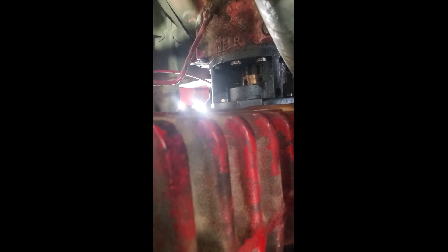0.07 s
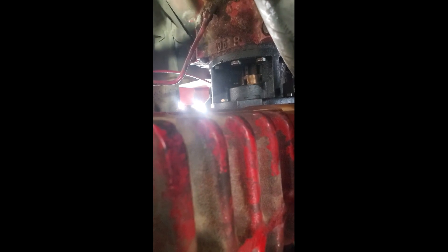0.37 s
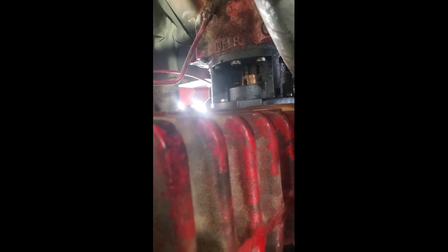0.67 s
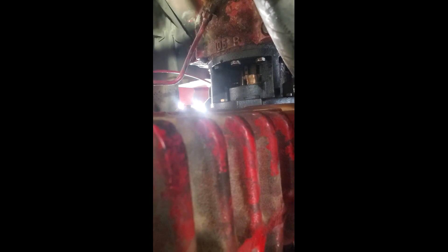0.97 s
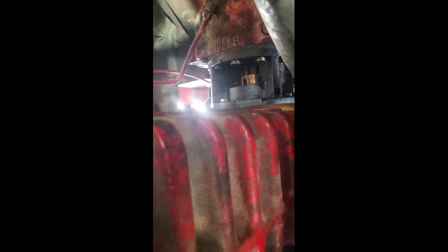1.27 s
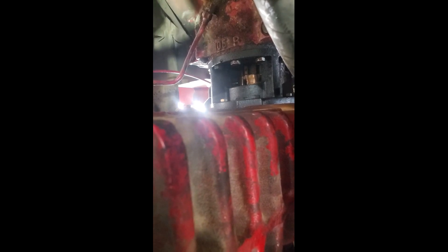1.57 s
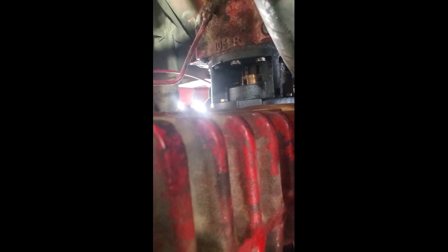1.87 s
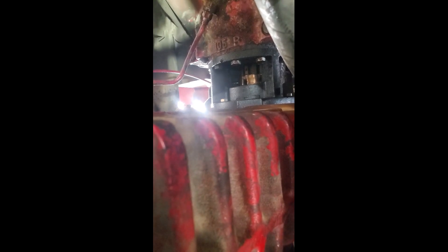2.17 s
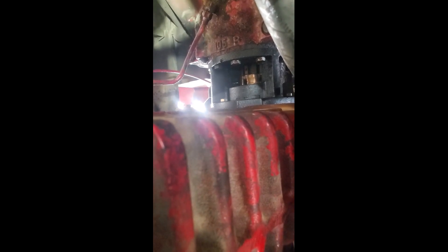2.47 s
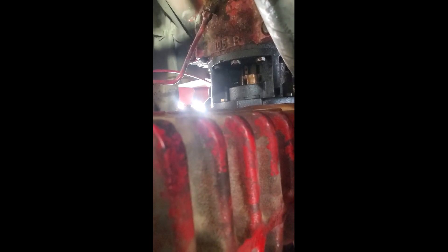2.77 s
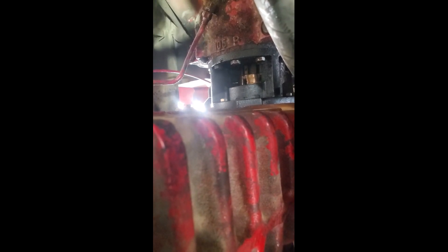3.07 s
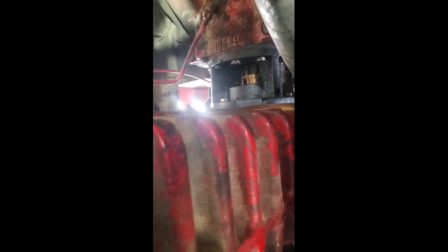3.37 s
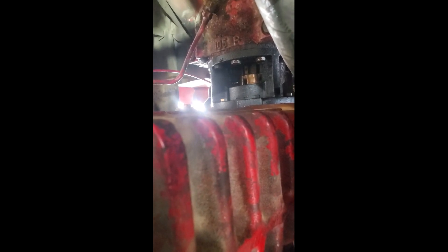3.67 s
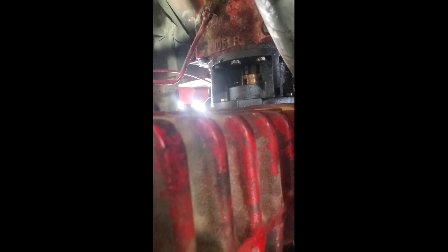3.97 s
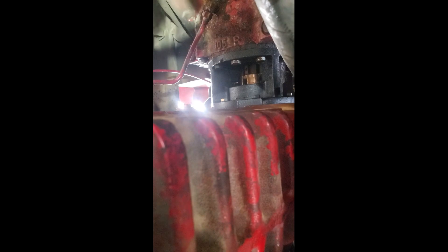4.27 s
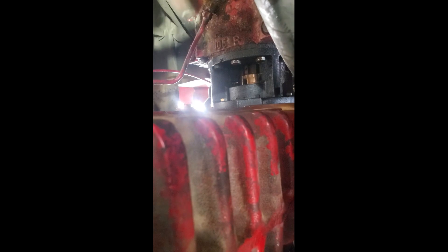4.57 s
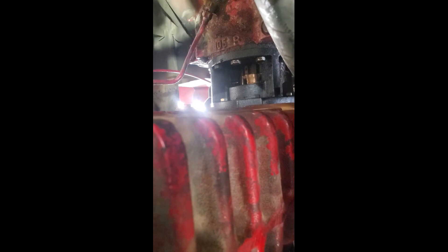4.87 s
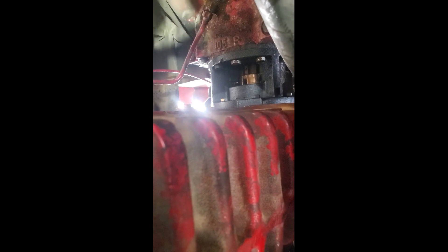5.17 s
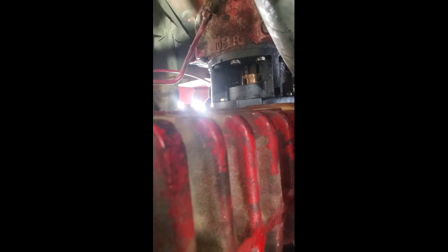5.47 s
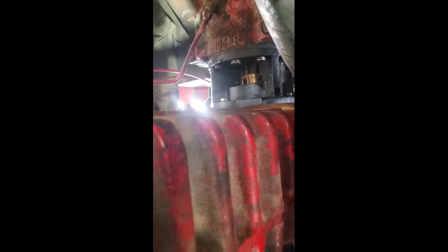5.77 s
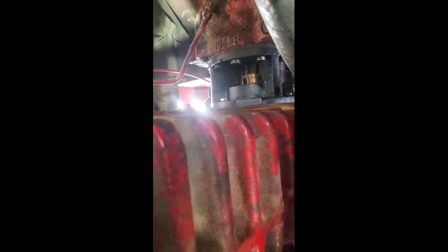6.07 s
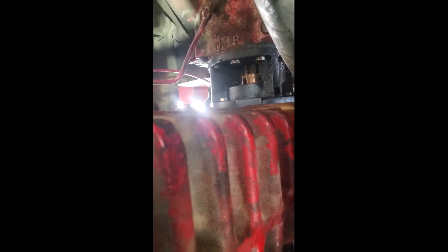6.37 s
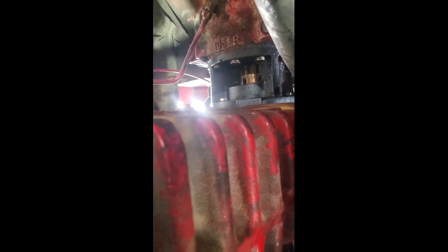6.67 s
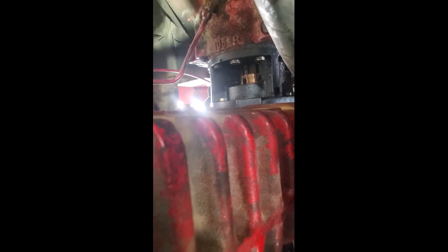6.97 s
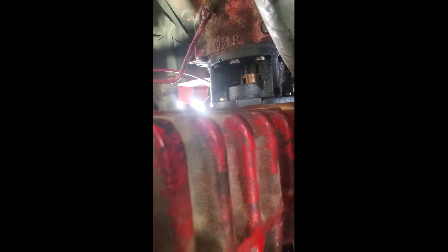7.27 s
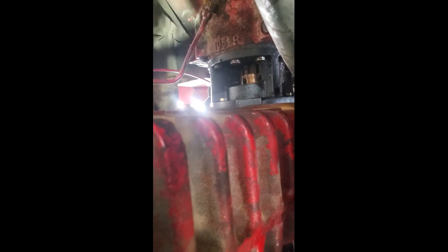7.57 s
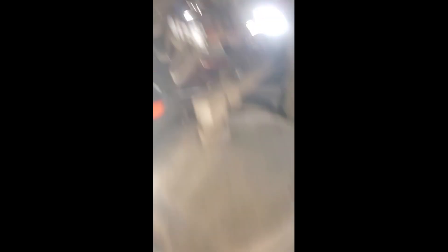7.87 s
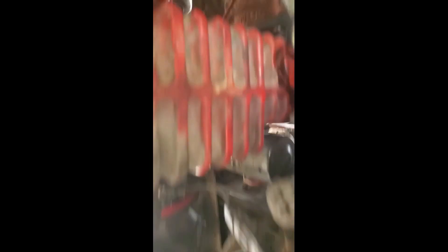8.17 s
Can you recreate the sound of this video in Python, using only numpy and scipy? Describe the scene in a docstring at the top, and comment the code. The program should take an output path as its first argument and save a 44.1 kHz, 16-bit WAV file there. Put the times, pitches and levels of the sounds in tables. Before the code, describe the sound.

Close beneath a fire truck in a garage, a loud engine drones and chugs at an even pace while valves knock and loose metal parts rattle and ring. Gears and belts add a thin, wavering whine, and water hisses softly through the pump with a few short swells. The sound holds steady, then breaks off abruptly.

```python
"""In a garage, under a fire truck, a six-cylinder engine drives the water pump at a steady speed.
Each firing pushes a puff out of the exhaust, so it chugs, and jolts loose parts, so they clatter.
Valves and injectors knock, gear teeth whine and belt-driven parts sing, all paced by the crankshaft.
Water hisses through the pump and now and then sputters. At the end the sound breaks off into silence."""
import sys
import numpy as np
from scipy import signal
from scipy.fft import rfft, irfft
from scipy.io import wavfile
from scipy.ndimage import map_coordinates

SR = 44100
rng = np.random.default_rng(int(sys.argv[2]) if len(sys.argv) > 2 else 0)


def generate_wav(sig):
    """Save sig (samples, or channels by samples) to the path in sys.argv[1] as 16-bit PCM at SR."""
    pcm = np.round(np.clip(np.atleast_2d(sig).T, -1, 1) * 32767).astype(np.int16)
    wavfile.write(sys.argv[1], SR, pcm)


N = 362061
TIME = np.arange(N) / SR
FREQS = np.fft.rfftfreq(N, 1 / SR)
CYLINDERS = 6

# Engine speed, drifting a little as the governor holds it: t/s, speed/(turns per minute)
ENGINE_SPEED = [(0.0, 1038.1), (0.25, 1038.5), (0.75, 1035.7), (1.45, 1036.9), (1.72, 1034.8),
                (2.08, 1037.3), (2.37, 1034.4), (3.3, 1036.2), (3.85, 1036.8), (4.1, 1034.7), (4.4, 1035.4),
                (4.62, 1038.3), (5.08, 1033.8), (5.45, 1037.4), (6.4, 1036.6), (6.75, 1035.0),
                (7.15, 1035.4), (7.5, 1038.4)]
# Tones of the exhaust; a tone's "order" is its cycles per crank turn: order, level/dB
EXHAUST_TONES = [(2.5, -48), (3, -21.1), (4, -39), (4.5, -23.6), (5, -26), (5.5, -37), (6, -25.6),
                 (6.5, -32.5), (7, -32.4), (7.5, -33), (8, -32.4), (8.5, -29.5), (9, -44.5), (9.5, -42)]
# Rumble of the uneven exhaust flow: f/Hz, level/dB per Hz
EXHAUST_RUMBLE = [(15, -70.5), (34, -63), (43, -57), (62, -48.5), (95, -46.5), (122, -44.5), (132, -54),
                  (146, -42), (162, -41.5), (182, -46.5), (205, -55.5), (400, -76)]
# Strength of the overtones in the repeating knock: f/Hz, level/dB
KNOCK_SPECTRUM = [(150, -78), (180, -50.5), (230, -47.5), (330, -46.5), (500, -50), (850, -47),
                  (1100, -53.5), (1450, -53.5), (1750, -47), (2400, -48), (2640, -49.5), (2850, -52.5),
                  (3500, -63), (8000, -95)]
# Rattle of loose engine parts: f/Hz, level/dB per Hz
RATTLE_SPECTRUM = [(150, -69.5), (240, -50.5), (520, -54), (880, -55.5), (1040, -58.5), (1250, -57),
                   (1450, -58.5), (1900, -56.5), (2700, -57.5), (3000, -62.5), (3800, -73), (4900, -74.5),
                   (8000, -101)]
# Pitches at which the garage, chassis and cast metal parts ring: f/Hz, width/Hz, peak level/dB per Hz
RESONANCES = [(112.7, 7.2, -36), (244.6, 18.6, -47.5), (319, 16, -52), (397, 67, -57), (487.7, 14.5, -49.5),
              (615.6, 22.7, -44.5), (798, 31, -53), (906, 90, -54.5), (1280, 25, -58), (1744, 29, -51),
              (1905, 33, -53), (2030, 30, -62.5), (2180, 81, -55), (2353, 35, -52), (2610, 14, -50),
              (2770, 19, -62), (2910, 46, -64.5), (3030, 30, -67), (3190, 22, -62.5), (3345, 40, -65.5),
              (3440, 45, -64.5), (3780, 98, -66), (4125, 40, -66), (4454, 90, -67.5), (6150, 490, -69.5),
              (9210, 180, -80.5), (11400, 100, -84.5)]
# Water rushing through the pump: f/Hz, level/dB per Hz
WATER_HISS = [(1500, -92), (3300, -71.5), (4400, -72), (4950, -74), (5200, -72.5), (5550, -74), (5800, -73),
              (6500, -73), (7150, -73.5), (7450, -80), (8600, -88), (9700, -87.5), (10600, -83.5),
              (12500, -84), (13700, -86.5), (15400, -83)]
# Tones tied to the crank, mainly from a 51-tooth gear:
# order, left level/dB, right level/dB, left side's lead/rad
GEAR_TONES = [(15, -43, -43, .3), (22, -40, -41, .7), (27, -40, -46, .6), (36, -37, -39, .2),
              (40, -39, -43, .7), (47, -42, -43, .7), (50, -45, -42, 1.1), (51, -30, -31, 2.1),
              (52, -36.5, -38.5, .7), (53, -34.5, -36.5, 1.8), (54, -41, -49, -2.3), (55, -41, -55, -1.3),
              (100, -47, -41, 0), (102, -28.5, -33.5, -1.9), (111, -47, -39, -2.1), (114, -42, -47, .2),
              (134, -50, -39, -2.6), (135, -40, -44, 2.6), (150, -55, -39, -.9), (153, -25.4, -26.1, -.3),
              (204, -46.5, -58, -.3), (255, -50, -53, 2.4), (306, -53, -59, .6), (357, -60, -41.5, -2.1)]
# Tones of the belt-driven parts and the pump at average speed:
# f/Hz, left level/dB, right level/dB, left side's lead/rad
BELT_TONES = [(186, -37, -42, .3), (280.2, -38, -37, .2), (380.5, -40, -41, .5), (447.6, -42, -40, .6),
              (560.4, -36, -40, .2), (596.5, -39, -37, .1), (1120.8, -52, -44, .8), (1298, -42, -50, 2.6),
              (1681.2, -42, -44, -.8), (1881, -35, -39, -2.0), (1968, -44, -45, -.8), (2325, -39, -41, 2.3),
              (2338, -39, -42, 2.3), (2403, -34, -36, -3.0), (2420, -34, -41, -2.0),
              (2562.5, -41, -38, -.3), (2723, -44, -47, -.6), (2843, -42, -52, .9), (2882, -45, -44, 1.6),
              (9070, -65, -65, 0)]
# Short swells of the hiss: middle t/s, length/s, centre f/Hz, width/Hz, peak level/dB per Hz
HISS_SURGES = [(0.278, .2, 5400, 2600, -72), (3.88, .3, 6300, 1300, -74), (5.3, .26, 4000, 1396, -69.5),
               (6.153, .12, 5600, 2400, -72.5), (6.46, .34, 6600, 1100, -69.5)]
# How alike the left and right sides sound: f/Hz, likeness (0 to 1)
SIDE_LIKENESS = [(60, .997), (170, .95), (350, .72), (620, .78), (850, .6), (1050, .3), (1300, .5),
                 (1700, .25), (2400, .4), (3500, .1), (7500, .12), (9500, .55), (11000, .9), (15000, .76)]
# How far the left side's wave runs ahead of the right's: f/Hz, lead/rad
LEFT_LEAD = [(60, .05), (170, .35), (270, .25), (450, .8), (620, .2), (900, 1.1), (1250, 2.8), (2000, 4.0),
             (7000, 2 * np.pi)]
# How much louder the left side is than the right: f/Hz, level/dB
LEFT_LOUDER = [(100, 2.5), (200, 0), (700, 3.5), (1000, -1), (1300, 5), (1600, -4.5), (2400, 1), (3300, -1),
               (4400, 3.5), (5400, -3), (6100, -5), (7000, 0), (7900, 4), (9000, 2), (11000, -0.5),
               (13000, -2), (15500, -4.5)]


def gain_of(db):
    """Turn decibels into a number to multiply a wave by."""
    return 10 ** (np.asarray(db) / 20)


def look_up(table, hz):
    """Read between a table's rows, along straight lines on a pitch (log-frequency) scale."""
    row_hz, value = np.transpose(table)
    return np.interp(np.log(hz + 1), np.log(row_hz + 1), value)


def wander(rate_hz):
    """A random drift of typical size 1, mostly slower than the given rate."""
    drift = irfft(rfft(rng.standard_normal(N)) / (1 + (FREQS / rate_hz) ** 2), N)
    return drift / drift.std()


def stereo(hz, a, b):
    """Blend two unrelated spectra into a left and a right one, most alike in the bass."""
    same = np.clip(look_up(SIDE_LIKENESS, hz), 0, 1)
    lean = gain_of(look_up(LEFT_LOUDER, hz) / 2)
    right = (same * a + np.sqrt(1 - same ** 2) * b) * np.exp(-1j * look_up(LEFT_LEAD, hz))
    return np.array([a * lean, right / lean])


def noise(spectrum):
    """Stereo noise with the given strength at each frequency (amplitude per root Hz)."""
    a, b = rfft(rng.standard_normal((2, N))) * np.sqrt(SR / 2)
    return irfft(stereo(FREQS, a, b) * spectrum, N)


def tone(cycles, left_db, right_db, lead, flutter, flutter_hz):
    """A stereo tone that follows a running count of cycles and wavers in level and timing."""
    shake = 1 + flutter * (wander(flutter_hz) + 1j * wander(flutter_hz))
    wave = np.exp(2j * np.pi * (cycles + rng.random())) * shake / np.sqrt(.5 + flutter ** 2)
    right = wave * np.exp(-1j * lead)
    return np.array([gain_of(left_db) * wave.real, gain_of(right_db) * right.real])


def crank():
    """Add up the engine's speed to count the crankshaft's turns so far."""
    turns_per_minute = np.interp(TIME, *np.transpose(ENGINE_SPEED))
    return np.cumsum(turns_per_minute) / 60 / SR


def exhaust(turns, pipe_delay_turns=.315, smear_cycles=.014, open_end_cycles=.13, uneven_cycles=.2):
    """Unequal firings repeat every two crank turns: low tones that chug over a rumble of gas."""
    chug = np.zeros(N)
    for order, db in EXHAUST_TONES:
        # The pipe delays and spreads each puff; its open end shifts all the tones alike.
        lag = pipe_delay_turns * order + smear_cycles * (order - CYLINDERS) ** 2 - open_end_cycles
        lag += uneven_cycles * (order % 1 > 0)  # half orders, from unequal cylinders, trail behind
        chug += np.sqrt(2) * gain_of(db) * np.sin(2 * np.pi * (order * turns - lag))
    rumble = noise(gain_of(look_up(EXHAUST_RUMBLE, FREQS)) * (FREQS < EXHAUST_RUMBLE[-1][0]))
    return chug * gain_of([[-.2], [.2]]) + rumble


def knock(turns, half_order_db=-8.0, size=8192):
    """Valves and injectors tap out the same pattern every two turns; most of it repeats each turn."""
    overtone = np.arange(size // 2 + 1)
    hz = overtone * turns[-1] / TIME[-1] / 2
    a, b = np.exp(2j * np.pi * rng.random((2, len(hz))))
    level_db = look_up(KNOCK_SPECTRUM, hz) + half_order_db * (overtone % 2)
    level_db += 0.6 * rng.standard_normal(len(hz))
    in_range = (hz > KNOCK_SPECTRUM[0][0]) & (hz < KNOCK_SPECTRUM[-1][0])
    pattern = irfft(stereo(hz, a, b) * gain_of(level_db) * in_range) * size / np.sqrt(2)
    position = turns / 2 % 1 * size  # loop the pattern at the crank's pace
    return np.array([map_coordinates(side, [position], order=3, mode="grid-wrap") for side in pattern])


def firing_jolts(turns, depth=0.35, decay_gaps=0.57, uneven=0.72, flicker_db=0.3, flicker_hz=258):
    """A loudness curve: each firing jolts the engine by its own amount, then fades in the gap after."""
    firings = turns * CYLINDERS / 2
    strength = np.exp(uneven * rng.uniform(-1, 1, N))[firings.astype(int)]
    jolts = 1 + depth * strength * np.exp(-(firings % 1) / decay_gaps)
    jolts *= gain_of(flicker_db * wander(flicker_hz))
    return jolts / np.sqrt(np.mean(jolts ** 2))


def clatter(turns):
    """Loose parts rattle with each firing, while the garage and the truck's metal ring steadily."""
    spectrum = gain_of(look_up(RATTLE_SPECTRUM, FREQS)) * FREQS / (FREQS + 60)  # thin out the deep bass
    rattle = noise(spectrum) * firing_jolts(turns)
    ring_power = sum((gain_of(db) / (1 + ((FREQS - hz) / (0.69 * width)) ** 2)) ** 2
                     for hz, width, db in RESONANCES)
    return rattle + noise(np.sqrt(ring_power))


def water(flicker_db=1.8, flicker_hz=70, swell_db=1.0, swell_hz=5, bands=8):
    """Water rushes through the pump: overlapping bands of hiss each flicker and swell on their own."""
    spectrum = gain_of(look_up(WATER_HISS, FREQS))
    span_hz = [WATER_HISS[1][0], WATER_HISS[-1][0]]
    band_position = np.interp(np.log(FREQS + 1), np.log(span_hz), [0, bands - 1])
    hiss = np.zeros((2, N))
    for band in range(bands):
        share = np.cos(np.pi / 2 * np.clip(band_position - band, -1, 1))
        band_hiss = noise(spectrum * share)
        hiss += band_hiss * gain_of(flicker_db * wander(flicker_hz) + swell_db * wander(swell_hz))
    return hiss


def gears(turns, sway_turns=.0006, slack_turns=0.00034, throb=0.15, throb_lag_turns=0.2, lope=0.047):
    """Gear teeth meet in step with the crank, which presses on them twice a turn: a throbbing whine."""
    shaft = turns + sway_turns * np.sin(2 * np.pi * turns)  # the crank runs a bit ahead, then behind
    shaft += slack_turns * wander(25)  # slack between the teeth blurs the overtones
    load = 1 + throb * np.cos(2 * np.pi * 2 * (turns - throb_lag_turns))
    load -= lope * np.cos(2 * np.pi * turns)  # a gentler dip once a turn
    return load * sum(tone(order * shaft, left_db, right_db, lead, flutter=0.057, flutter_hz=19)
                      for order, left_db, right_db, lead in GEAR_TONES)


def belt(turns):
    """Belt-driven parts follow the crank only loosely, so their tones waver more than the gears' do."""
    engine_time = turns / turns[-1] * TIME[-1]  # a clock that runs faster when the engine does
    return sum(tone(hz * engine_time, left_db, right_db, lead, flutter=0.44, flutter_hz=5.9)
               for hz, left_db, right_db, lead in BELT_TONES)


def surges(sputter_db=2.5, sputter_hz=60):
    """Now and then one band of the water's hiss swells and sputters for a moment."""
    hiss = np.zeros((2, N))
    for middle, length, hz, width, db in HISS_SURGES:
        swell = np.cos(np.pi * np.clip((TIME - middle) / length, -.5, .5))
        spectrum = gain_of(db) * np.exp(-2 * ((FREQS - hz) / width) ** 2)
        hiss += swell * noise(spectrum)
    return hiss * gain_of(sputter_db * wander(sputter_hz))


def scene():
    """One crank sets the pace for all the moving parts, and the water hisses alongside."""
    turns = crank()
    engine = exhaust(turns) + knock(turns) + clatter(turns)
    return engine + water() + gears(turns) + belt(turns) + surges()


def record(dry, stop_s=7.676, fade_s=.002, top_hz=15800):
    """Stop the sound suddenly and take away the very highest treble."""
    stopped = dry * np.clip((stop_s - TIME) / fade_s, 0, 1)
    low_pass = signal.firwin(511, top_hz, window=("kaiser", 9), fs=SR)
    return signal.oaconvolve(stopped, low_pass[None], "same")


dry = scene()
out = record(dry)
generate_wav(out)
```